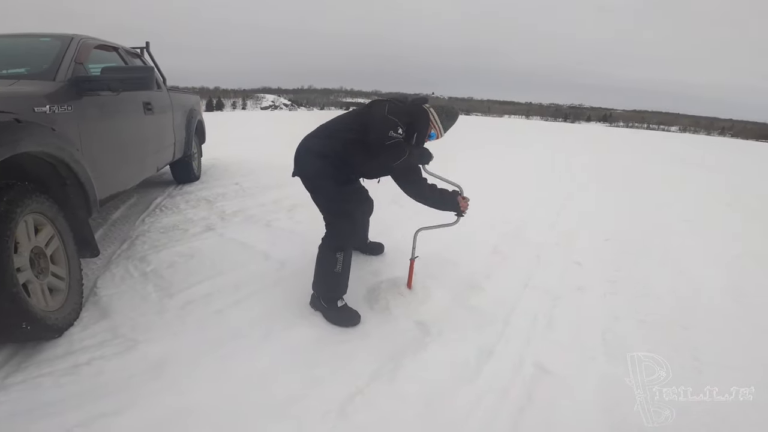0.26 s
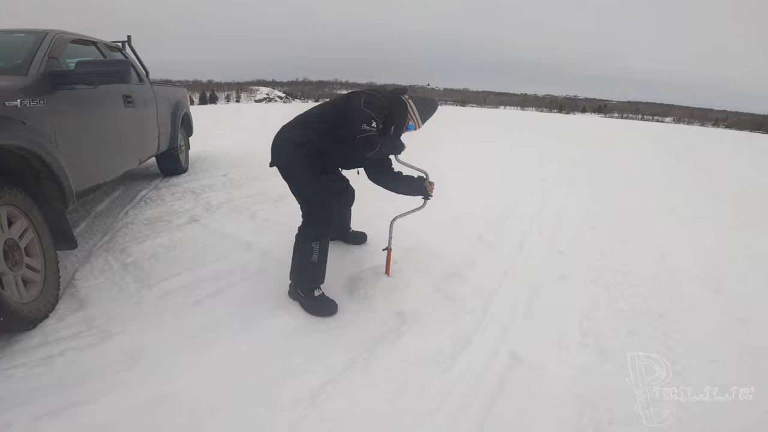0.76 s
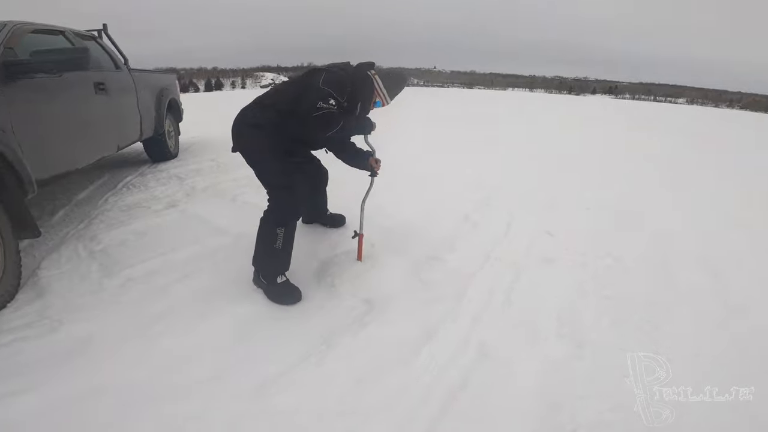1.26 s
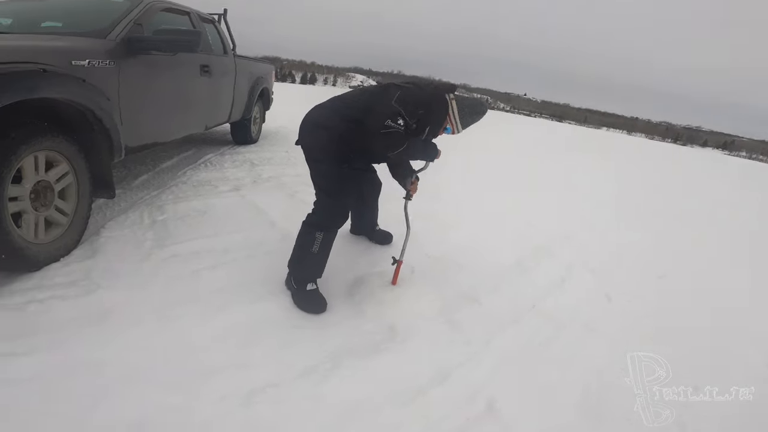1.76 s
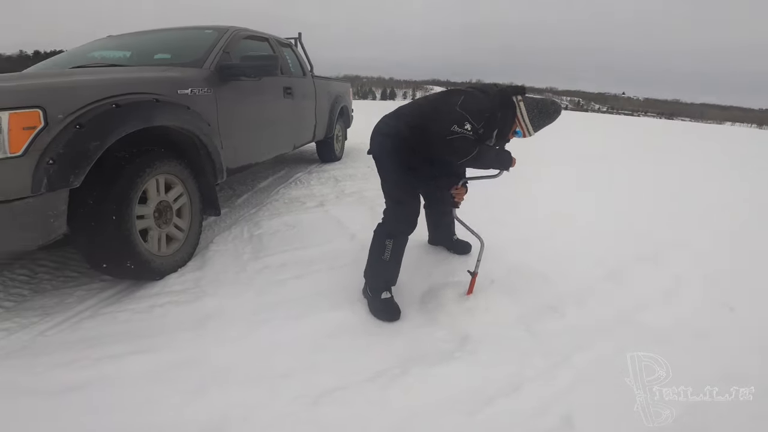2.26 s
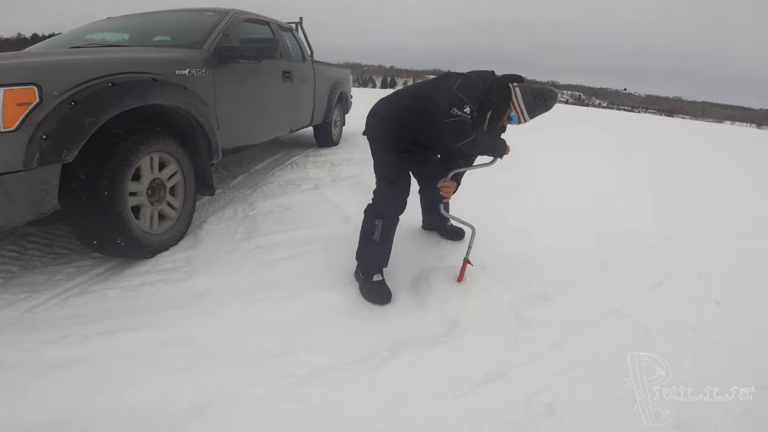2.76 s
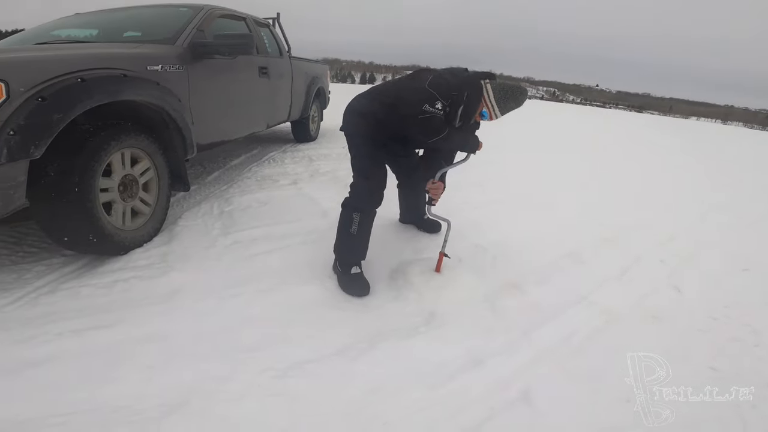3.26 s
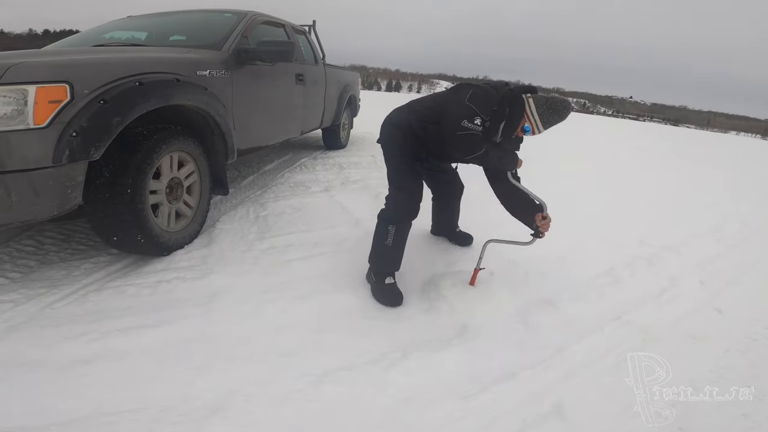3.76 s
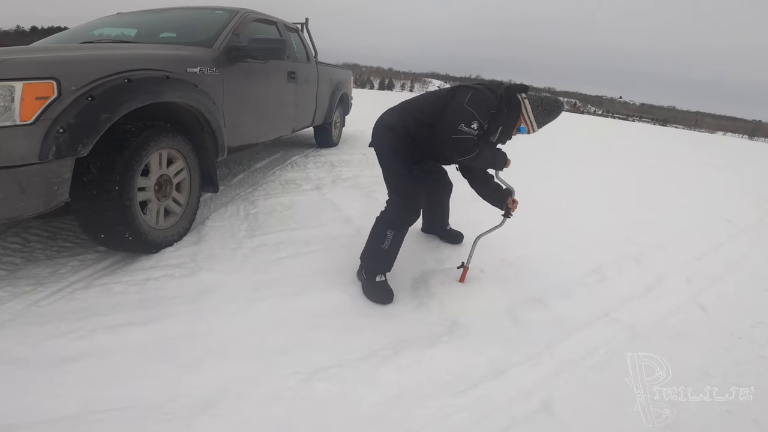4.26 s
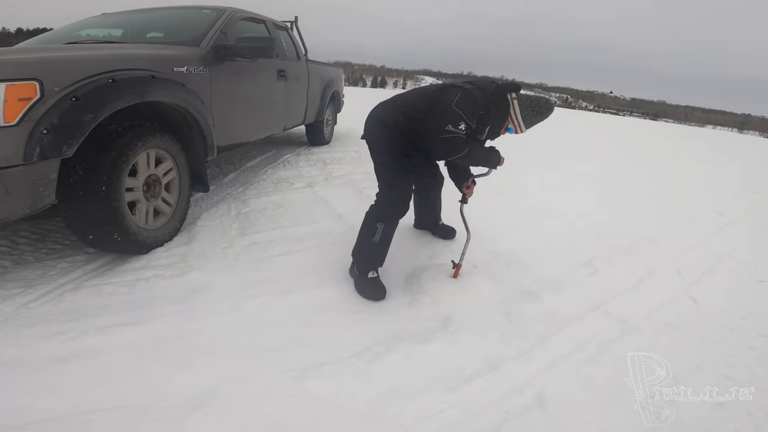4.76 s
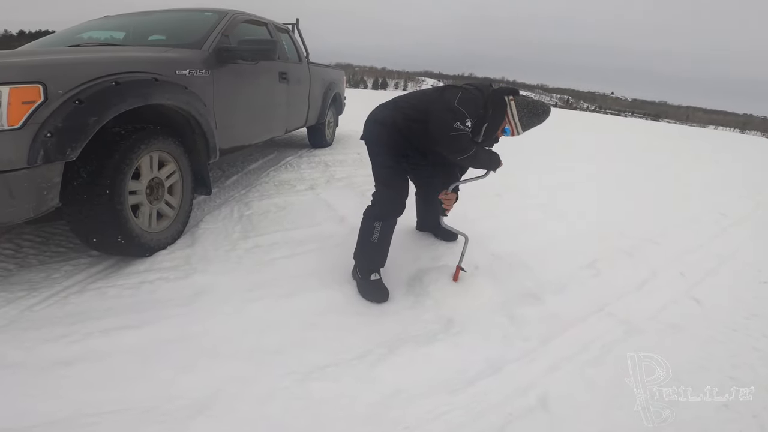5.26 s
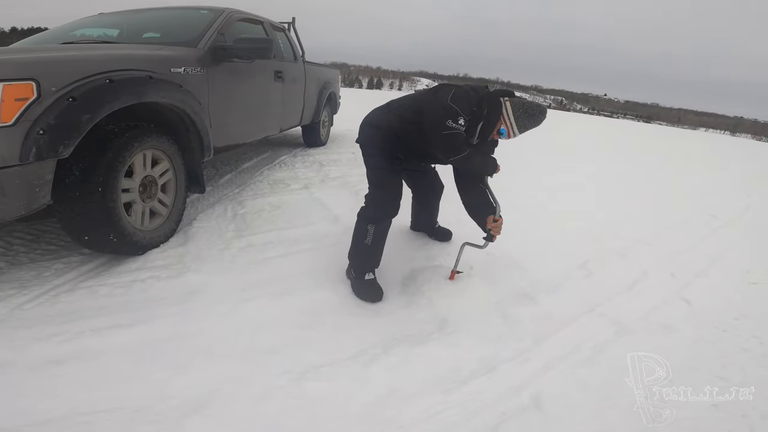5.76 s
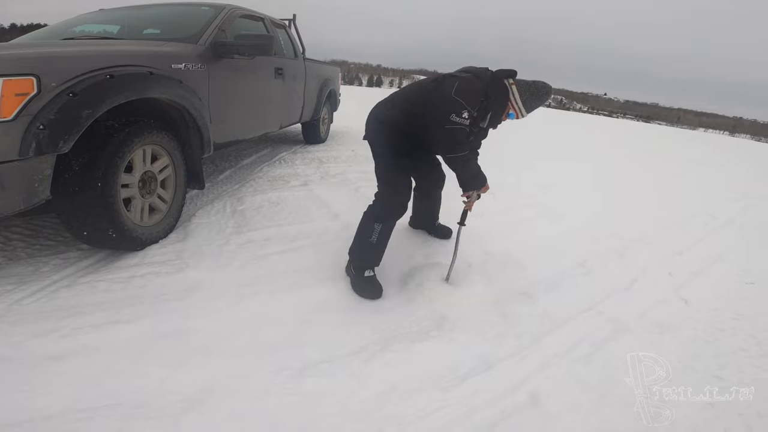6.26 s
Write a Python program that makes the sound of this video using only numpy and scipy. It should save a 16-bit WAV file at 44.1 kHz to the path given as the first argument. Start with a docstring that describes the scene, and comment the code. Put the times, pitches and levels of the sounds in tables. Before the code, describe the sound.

A steel hand drill turns steadily in thick ice: crushed, hollow grinding, bright stick-slip scrape and fine flaky hiss, pulsing nearly twice a second. Sharp snaps cluster near four seconds as the blades catch. Wind rumbles and flutters against the microphone, stronger after two seconds. It is dry and outdoors, without echo. Cutting stops just after six seconds, ending with wind and a faint snowy crunch.

```python
"""From the start, wind buffets and thumps on the microphone over open snow that gives no echo.
A hand auger is cranked into thick lake ice: each push crushes ice in a dull, ringing grind of random breaks,
while stick-slip breaks ring the blades in a scrape and flakes hiss as crisp shavings.
Blades catch, dig in with a rasp or snap off chips; the airy top is muffled early on and loose chips build up.
The cranking stops after six seconds and a boot shifts softly in the snow at the end."""
import sys
import numpy as np
from scipy import signal
from scipy.fft import rfft, irfft
from scipy.io import wavfile
from scipy.ndimage import uniform_filter1d, map_coordinates

SR = 44100
rng = np.random.default_rng(int(sys.argv[2]) if len(sys.argv) > 2 else 0)


def transcribe(u):
    """Save the signal u as a 16-bit wav file named by the first command-line argument.

    u: samples, shape (n,) or (channels, n), limited to [-1, 1]; the rate is SR.
    q: integer samples, one column per channel.
    """
    v = np.clip(np.atleast_2d(u).T, -1, 1)
    q = np.round(v * 32767).astype(np.int16)
    wavfile.write(sys.argv[1], SR, q)


N = 287796

# pushes on the brace, two to a turn: start t/s, end t/s, grind change level/dB, ring change of the sheet level/dB
PUSHES = [(-0.12, 0.09, 4, 2.5), (0.47, 0.654, 10, 5), (0.982, 1.287, 4.5, 4), (1.607, 1.82, 7.5, 16),
          (2.14, 2.4, 6, 11.5), (2.71, 2.93, 2.5, 11), (3.33, 3.638, 4, 10.5), (3.95, 4.32, 7, 10),
          (4.58, 4.827, 0, 29), (5.24, 5.58, -0.5, 16)]
# low resonances of the hole and the ice round it: f/Hz, width f/Hz, level/dB
ICE_LOW_MODES = [(517, 75, 2), (612, 57, -5), (767, 94, -1.5)]
# high resonances of the hole and the ice round it: f/Hz, width f/Hz, level/dB
ICE_HIGH_MODES = [(1123, 140, 1.8), (1338, 224, 0.25)]


def grind(judder, push_db):
    """Crushed ice makes the hole ring dully; a hard push broadens the crunch and rings the whole sheet."""
    # broad colour of the crunch: f/Hz, level/dB
    crush_colour = [(200, -15), (400, -6), (700, -1.5), (1400, -12.5), (1800, -11), (2400, -10),
                    (4000, -17), (9000, -71)]
    load_db = push_swells([(start, end, ring_db) for start, end, _, ring_db in PUSHES])
    # the sheet's ring weakens as the blades sink
    start_db, sinking_db_per_s = -2, -3.5
    sheet_db = start_db + sinking_db_per_s * np.arange(N) / SR + load_db
    crunch_db = -6.5 + 0.096 * load_db

    breaks = fractures(per_s=2000, spread_db=-0.5)
    chunks = fractures(per_s=1100, spread_db=1.5)
    low = steady(band(body(chunks, ICE_LOW_MODES, wander_db=1.0), 414, 1390))
    high = waver(body(breaks, ICE_HIGH_MODES, wander_db=3.0), share=0.0248, rate=13.0)
    high = steady(band(high, 925, 1655))
    crunch = colour(rms_one(breaks) + rms_one(chunks), crush_colour)

    ring = from_db(sheet_db) * low + from_db(-4.0) * high + from_db(crunch_db) * crunch
    ring = steady(spiral(ring, echo_db=-19, turning=5.0))
    return from_db(1.5 + push_db + 1.2 * judder) * ring


def scrape(judder, push_db):
    """The steel edges stick and slip over the ice, thousands of times a second."""
    # resonances of the steel blades and spiral: f/Hz, width f/Hz, level/dB
    blade_modes = [(2440, 116, 1.5), (2800, 550, -6.5), (3177, 150, -1.5), (3756, 150, -4.5),
                   (4280, 470, -8), (4530, 840, -5.5), (4880, 290, -7)]
    push_share = 0.56  # share of a push's dB that reaches the scrape
    slips = fractures(per_s=2800, spread_db=-0.6)
    ring = band(body(slips, blade_modes, wander_db=4.5), 2540, 4820, order=3)
    ring = steady(spiral(ring, echo_db=-11.5, turning=12.6))
    throb = from_db(0.98 * judder)
    return from_db(-3.0 + push_share * push_db) * throb * ring


def shavings(judder, push_db):
    """Fine flakes peel off and rush up the spiral with a crisp hiss that has an airy top."""
    # high resonances of the steel edges: f/Hz, width f/Hz, level/dB
    edge_modes = [(5770, 1000, -7), (6420, 750, -3), (6870, 440, -4), (7830, 280, -1.5), (8260, 1900, -14),
                  (10550, 1100, -10.5)]
    # broad colour of the flakes: f/Hz, level/dB
    shaving_colour = [(1500, -2), (4000, 1.5), (7500, 6), (9000, -19), (10200, -1.5), (11500, -20),
                      (15000, -54)]
    push_share = 0.38  # share of a push's dB that reaches the shavings
    # the airy top against the hiss is muffled as the blades sink below the surface
    open_db, muffled_db = -14.5, -25
    air_db = open_db + (muffled_db - open_db) * ramp(start_s=2.1, end_s=3.3)

    flakes = fractures(per_s=7600, spread_db=0.0)
    ringing = rms_one(band(body(flakes, edge_modes, wander_db=3.5), 4800, 9300, order=6))
    hiss = ringing + from_db(-8.5) * colour(flakes, shaving_colour)
    hiss = steady(spiral(hiss, echo_db=-9.0, turning=31))
    air = rms_one(band(resonance(rng.standard_normal(N), 9320, 740), 7400, 21000))
    return from_db(-0.24 + push_share * push_db + 0.82 * judder) * (hiss + from_db(air_db) * air)


def bites():
    """Brief surges of the cut in dB, at uneven moments and of uneven strength."""
    bites_per_s, bite_s, bite_db = 24, 0.0076, 2
    hits = rng.uniform(0, 2.8, N) * (rng.random(N) < bites_per_s / SR)
    surge = signal.fftconvolve(hits, np.hanning(int(bite_s * SR) + 3), "same")
    return bite_db * (np.minimum(surge, 2) - surge.mean())


def snaps(breadth):
    """A chip lets go with a sharp crack that knocks on the ice round the hole, then crumbles for milliseconds."""
    # chips snapping off: t/s, crack level/dB, pitch f/Hz, crumbling against the crack level/dB,
    # crumbling decay t/s, knock against the crack level/dB
    chips = [(0.156, -23, 2600, -14, 0.002, -18), (0.313, -23, 900, -11, 0.0023, -18),
             (0.846, -16.5, 1140, -18, 0.0039, -7), (1.509, -24, 2200, -10, 0.003, -11),
             (1.75, -24, 1200, -8, 0.0032, 3), (2.0748, -18, 1270, -14, 0.0011, -15),
             (2.441, -12.5, 1250, -16, 0.0019, -5), (2.454, -19, 1700, -15, 0.003, -8),
             (2.697, -22, 1500, -10, 0.003, -11), (2.751, -15, 985, -27, 0.0021, -3),
             (2.774, -22.5, 1400, -2, 0.019, -15), (2.985, -17, 730, -21, 0.0021, -2),
             (3.3491, -12, 990, -14, 0.0015, -15), (3.765, -19, 1280, -2, 0.0059, -10),
             (3.82, -24, 1380, -11, 0.0036, -15), (3.864, -22, 1700, -10, 0.0028, -12),
             (3.905, -13.5, 2600, -6, 0.0033, -22), (3.953, -19, 2700, -6, 0.003, -18),
             (4.005, -19, 2800, -9, 0.0045, -4), (4.066, -21, 2800, -16, 0.002, -19),
             (4.0778, -9.5, 2270, -21, 0.0028, -29), (4.0794, -13.5, 2300, -7, 0.003, -30),
             (4.128, -20, 1700, 2, 0.004, -5), (4.343, -17, 1380, -6, 0.0053, -9),
             (4.3805, -18, 1810, -3, 0.0036, -3.5), (4.728, -31, 1100, -2, 0.008, -6),
             (5.337, -22, 1500, -12, 0.0045, -10), (5.590, -31, 1100, -20, 0.002, 7),
             (5.988, -16, 2440, -5, 0.0035, -7), (6.013, -21, 2500, 2, 0.0036, -5.5),
             (6.069, -19, 2000, -9, 0.0082, -15), (6.076, -19, 2100, -8, 0.007, -16),
             (6.117, -29, 2580, 0, 0.0054, -18), (6.207, -28, 3000, 0, 0.004, -16),
             (6.2377, -26, 2460, -7, 0.004, -17), (6.324, -36, 2400, -5, 0.004, -14)]
    out = np.zeros(N)
    t = np.arange(SR // 10) / SR
    all_grains = rng.standard_normal((len(chips), len(t)))
    for (s, db, hz, crumble_db, crumble_s, knock_db), grains in zip(chips, all_grains):
        force = from_db(crumble_db) * grains * np.exp(-t / crumble_s)
        force[0] -= 1  # the crack itself
        crack = band(resonance(force, hz, breadth * hz), 290, 7100)
        knock = sum(from_db(mode_db) * resonance(force, mode_hz, width) / width
                    for mode_hz, width, mode_db in ICE_LOW_MODES + ICE_HIGH_MODES)
        knock = band(knock, 420, 1800)
        snap = crack / np.abs(crack).max() + from_db(knock_db) * knock / np.abs(knock).max()
        snap = band(snap, 200, 8500, order=8)
        at = round(s * SR)
        out[at:at + len(t)] += from_db(db) * snap[:N - at]
    return out


def splinters(per_s, cycles, count=24):
    """Loose chips knock together and ring briefly, each size at its own pitch; middling sizes dominate."""
    knocks = fractures(per_s, spread_db=1.0)
    dealt = rng.integers(0, count, N)  # which size each knock falls to
    pitches = np.geomspace(1500, 4500, count)
    rings = sum(resonance(knocks * (dealt == k), hz, hz / cycles) / hz for k, hz in enumerate(pitches))
    return rms_one(resonance(rings, 2770, 690))


def crackle(count=8):
    """Ice crystals give way in tiny gritty bursts, spread over several pitches."""
    # the ice crackles under strain: start t/s, end t/s, crackle change level/dB
    strains = [(3.83, 4.07, 3.5), (4.56, 4.88, 3.5), (5.92, 6.08, -1)]
    level_db, bursts_per_s, decay_s = -10.5, 95, 0.0014  # level is against the scrape
    out = 0
    for hz in np.geomspace(1700, 4800, count):
        breaks = np.abs(fractures(bursts_per_s / count, spread_db=0.5))
        burst = signal.lfilter([1], [1, -np.exp(-1 / (decay_s * SR))], breaks + 1e-18)
        out = out + resonance(burst * rng.standard_normal(N), hz, hz / 2)
    strain_db = swells(strains, attack_s=0.015, release_s=0.015)
    return from_db(level_db + strain_db) * rms_one(band(out, 1410, 5640, order=4))


def wind():
    """Gusts push on the microphone port and shed quicker eddies, some with a thump; a long gust flutters."""
    # wind on the microphone: t/s, slow buffeting level/dB, quick eddies level/dB
    wind_curve = [(0, -28.5, -32.5), (0.47, -34.5, -34), (0.57, -28, -26), (0.75, -28, -33),
                  (1.3, -30, -34.5), (1.62, -35, -33.5), (1.85, -34.5, -33), (2.28, -21.5, -27.5),
                  (2.58, -23.5, -25), (2.8, -21, -31), (3.22, -24, -37), (3.36, -26, -31),
                  (3.76, -26, -33.5), (3.94, -25, -30), (4.3, -33, -39), (4.43, -25.5, -27.5),
                  (4.83, -27, -28), (4.94, -22.5, -36.5), (5.12, -21.5, -30), (5.22, -19.5, -22),
                  (5.45, -22.5, -22.5), (5.62, -22, -22), (5.83, -26, -25.5), (6.0, -19, -30),
                  (6.17, -26, -35), (6.31, -25.5, -27), (6.39, -25.5, -34.5), (6.5, -21, -25)]
    # single eddies that thump: middle t/s, length t/s, buffeting change level/dB, eddies change level/dB
    thumps = [(0.62, 0.13, 3, 1), (1.133, 0.062, 7, 1.5), (1.333, 0.13, 5.5, 0), (2.254, 0.16, -3, 5),
              (2.445, 0.18, -2, 2.5), (2.55, 0.1, 6.5, -0.5), (2.608, 0.051, 1, 8), (2.68, 0.057, 6, -11),
              (2.795, 0.088, -2, 6.5), (2.956, 0.17, 2, 4), (3.083, 0.19, 2.5, 3.5), (3.24, 0.24, 4, 8.5),
              (3.614, 0.088, 3.5, 4.5), (3.9, 0.18, 3.5, 1.5), (3.944, 0.085, 5, 0), (4.163, 0.14, 6, 3),
              (4.657, 0.086, 4.5, 5), (4.944, 0.061, 7.5, 9.5), (5.277, 0.053, -2, 2), (5.474, 0.06, 6, 2),
              (5.592, 0.035, -2, 7.5), (5.984, 0.12, -8, 6.5), (6.063, 0.18, 2, 0), (6.305, 0.063, 6, 5)]
    # sustained gusts: start t/s, end t/s, flutter change level/dB
    gusts = [(2.17, 2.50, -3), (5.16, 5.62, 11)]
    # broad colour of the slow buffeting: f/Hz, level/dB
    buffet_colour = [(10, -22), (22, -5.5), (50, -3.5), (110, -6.5), (160, -12.5), (300, -36), (800, -81)]
    # broad colour of the quick eddies: f/Hz, level/dB
    eddy_colour = [(50, -14), (110, -1.5), (160, -0.5), (230, -3.5), (330, -10.5), (450, -19), (700, -29),
                   (1500, -74), (5000, -83)]
    # broad colour of the ragged flutter: f/Hz, level/dB
    flutter_colour = [(130, -4), (240, 9.5), (350, 7), (480, 0), (750, -6.5), (1500, -40), (4000, -65)]

    buffet_db, eddy_db = in_time(wind_curve)
    heave_db = humps([(s, length, db) for s, length, db, _ in thumps])
    thump_db = humps([(s, length, db) for s, length, _, db in thumps])
    buffets = from_db(buffet_db + heave_db - 1.5) * turbulence(buffet_colour, lumpy_db=1.4)
    eddies = from_db(eddy_db + thump_db - 2) * turbulence(eddy_colour, lumpy_db=1.8)
    flutter_db = eddy_db - 19 + swells(gusts, attack_s=0.046, release_s=0.54)
    return buffets + eddies + from_db(flutter_db) * turbulence(flutter_colour, lumpy_db=1.0)


def turbulence(spectrum, lumpy_db):
    """Pressure swings, lumpy from one eddy to the next."""
    swings = steady(colour(rng.standard_normal(N), spectrum), count=18)
    return rms_one(swings * from_db(lumpy_db * drift(23.0)))


def snow():
    """Air hisses faintly over the snow; at the end a boot shifts in it with a soft, fine crunch of breaks."""
    # broad colour of the snow: f/Hz, level/dB
    snow_colour = [(300, -7), (600, -4), (940, -5.5), (2150, -8), (2800, -12), (7700, -21.5), (11000, -40),
                   (14000, -52)]
    hiss_db, shuffle_db = -59, -44.5
    shuffle_start_s, shuffle_rise_s = 6.425, 0.028
    hiss = from_db(hiss_db) * colour(rng.standard_normal(N), snow_colour)
    shuffle = from_db(shuffle_db) * colour(fractures(per_s=5500, spread_db=3.5), snow_colour)
    return hiss + ramp(shuffle_start_s, shuffle_start_s + shuffle_rise_s) * shuffle


def fractures(per_s, spread_db):
    """Tiny breaks of either sign at random moments, their dB sizes spread exponentially."""
    sizes = from_db(spread_db * np.minimum(rng.exponential(1, N), 4))
    return sizes * rng.choice([-1, 1], N) * (rng.random(N) < per_s / SR)


def body(clicks, modes, wander_db):
    """Each break strikes every resonance with its own strength; the shifting contact favours them in turn."""
    out = 0
    for hz, width, db in modes:
        strikes = clicks * rng.standard_normal(N) * from_db(db + wander_db * drift(8))
        out = out + resonance(strikes, hz, width)
    return rms_one(out)


def spiral(x, echo_db, turning):
    """Short reflections swell and fade at random, about `turning` times a second, in streaks of colour."""
    # detours of the sound by way of the spiral and the wall of the hole: delay t/s
    detours = [.0008, .00125, .0016, .00215, .0026, .0033, .0038, .0049, .0058]
    out, power = x, 1
    for delay in detours:
        share = from_db(echo_db) * drift(turning)
        out = out + share * np.interp(np.arange(N) - delay * SR, np.arange(N), x, left=0)
        power = power + share ** 2
    return out / np.sqrt(power)


def waver(x, share, rate):
    """The pitch of a ring wanders by a small share as the blades move round the hole."""
    ahead = np.cumsum(share * drift(rate))
    ahead = ahead - uniform_filter1d(ahead, SR // 4)  # keeps the time shift small
    return map_coordinates(x, [np.arange(N) + ahead], order=3, mode="mirror")


def resonance(x, hz, width):
    """One resonance with a gain of one at its top."""
    r = np.exp(-np.pi * width / SR)
    zeros = np.array([1, 0, -1]) * (1 - r * r) / 2
    poles = [1, -2 * r * np.cos(2 * np.pi * hz / SR), r * r]
    return signal.lfilter(zeros, poles, x + 1e-18)


def band(x, low_hz, high_hz, order=2):
    """Butterworth band-pass."""
    edges_hz = [low_hz, min(high_hz, .45 * SR)]
    return signal.sosfilt(signal.butter(order, edges_hz, "band", fs=SR, output="sos"), x)


def colour(x, points):
    """Give x a broad spectrum, drawn over log frequency; rms one."""
    hz, db = np.transpose(points)
    bins = np.fft.rfftfreq(N, 1 / SR) + 1e-3  # keeps the logarithm finite
    gain = from_db(np.interp(np.log(bins), np.log(hz), db))
    return rms_one(irfft(rfft(x) * gain, N))


def from_db(db):
    """Decibels to gain."""
    return 10 ** (np.asarray(db) / 20)


def rms_one(x):
    """Scale to an rms of one."""
    return x / np.sqrt(np.mean(x ** 2) + 1e-20)


def steady(x, count=30):
    """Even out the rms of x to about one over windows of 1 / count of a second, keeping its grain."""
    power = uniform_filter1d(uniform_filter1d(x ** 2, SR // count), SR // count)
    return x / np.sqrt(np.abs(power) + 1e-20)


def drift(rate, count=40):
    """Smooth chance of rms one, changing about `rate` times a second; drawn at every count-th sample."""
    hz = np.fft.rfftfreq(N // count + 2, count / SR)
    slow = irfft(rfft(rng.standard_normal(N // count + 2)) / (1 + (hz / rate) ** 2))
    return np.interp(np.arange(N) / count, np.arange(len(slow)), rms_one(slow))


def in_time(rows):
    """Each column of a curve, at every sample."""
    s, *columns = np.transpose(rows)
    return [np.interp(np.arange(N) / SR, s, c) for c in columns]


def ramp(start_s, end_s):
    """Rises evenly from zero to one between two moments."""
    return np.clip((np.arange(N) / SR - start_s) / max(end_s - start_s, 1 / SR), 0, 1)


def swells(rows, attack_s, release_s, sag=0):
    """Each row moves from its start towards its dB, sags by a share until its end, and falls back."""
    return sum(db * (ramp(start, start + attack_s) - ramp(end, end + release_s)) * (1 - sag * ramp(start, end))
               for start, end, db, *_ in rows)


def push_swells(rows):
    """The dB of each push builds up, loses over half its strength by the end, and lets go."""
    return swells(rows, attack_s=0.13, release_s=0.19, sag=0.59)


def humps(rows):
    """Each row moves smoothly to its dB at its middle and back again."""
    t = np.arange(N) / SR
    return sum(db * np.maximum(1 - (2 * (t - s) / length) ** 2, 0) ** 2 for s, length, db in rows)


def scene():
    """Pushes, rasps and bites swell the cut, catches choke it; the auger judders whole, each edge a little alone."""
    # cut between pushes, dying away at the stop: t/s, grind level/dB, scrape level/dB, shavings level/dB
    cut_curve = [(0, -32.5, -35, -41.5), (0.35, -34.5, -36, -42), (1.1, -32.5, -33.5, -40),
                 (1.33, -32, -35.5, -40.5), (1.5, -34.5, -34.5, -40), (1.85, -35, -36, -43),
                 (2.05, -36.5, -37, -42.5), (2.35, -33, -32.5, -40), (2.65, -34.5, -34, -43),
                 (3.1, -33, -30, -39.5), (3.16, -37, -31.5, -41.5), (3.32, -40.5, -33, -40),
                 (3.39, -36, -33, -41), (3.66, -34.5, -33, -41), (3.85, -36.5, -31.5, -41.5),
                 (4.5, -39, -35, -41.5), (4.75, -32, -32, -39.5), (5.05, -37, -34, -43.5),
                 (5.7, -43, -35.5, -44), (6.07, -45.5, -37, -47.5), (6.13, -50, -42, -47),
                 (6.24, -49.5, -45.5, -52), (6.275, -53, -49, -56), (6.41, -64, -62, -66),
                 (6.53, -67, -53, -66)]
    # the blades catch and hang for a moment: start t/s, end t/s, drop level/dB
    catches = [(0.17, 0.23, 1.5), (0.32, 0.40, 1), (1.39, 1.44, 3), (1.99, 2.12, 1.5), (3.70, 3.775, 6.5),
               (4.088, 4.16, 7), (4.36, 4.42, 5.5)]
    # a blade digs in with a bright rasp: start t/s, end t/s, extra level/dB
    rasps = [(0.143, 0.166, 1.5), (0.585, 0.625, 1), (0.684, 0.72, 2), (1.345, 1.366, 2.5),
             (2.52, 2.575, 2.5), (2.632, 2.654, 3), (3.015, 3.052, 2), (3.525, 3.575, 2),
             (3.63, 3.692, 1.5), (3.93, 3.966, 2.5), (4.228, 4.266, 3.5), (4.835, 4.877, 1),
             (5.188, 5.22, 4), (5.252, 5.298, 2.5), (5.53, 5.572, 3.5), (5.635, 5.668, 3), (5.89, 5.911, 5),
             (5.925, 5.953, 4.5)]

    grind_db, scrape_db, shaving_db = in_time(cut_curve)
    push_db = push_swells(PUSHES)
    catch_db = swells(catches, attack_s=0.0017, release_s=0.015)
    edge_db = swells(rasps, attack_s=0.0011, release_s=0.0011) - catch_db
    # loose chips against the scrape, growing as the hole fills
    loose_db, loose_full_db = -13.5, -1.5
    chips_db = loose_db + (loose_full_db - loose_db) * ramp(start_s=2.4, end_s=6.9)

    shake = drift(9.7)  # judder of the whole auger
    layers = [
        (grind_db - catch_db, grind),
        (scrape_db + edge_db, scrape),
        (shaving_db + edge_db, shavings),
    ]
    cutting = sum(from_db(db) * source(rms_one(shake + drift(50)), push_db) for db, source in layers)
    loose_chips = from_db(chips_db + shake) * splinters(per_s=700, cycles=55)
    debris = from_db(scrape_db + edge_db) * (loose_chips + crackle())
    cut = from_db(bites()) * (cutting + debris)
    return (cut + snaps(breadth=0.53) + snow() + wind())[None]


def record(dry):
    """The top is cut steeply below 16.2 kHz and the sound ends with a 3 ms fade."""
    fade = np.minimum(np.arange(N)[::-1] / (.003 * SR), 1)
    return fade * signal.sosfilt(signal.cheby2(12, 70, 16200, fs=SR, output="sos"), dry)


dry = scene()
out = record(dry)
transcribe(out)
```